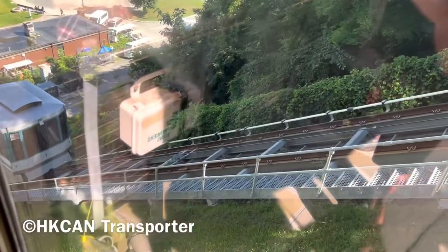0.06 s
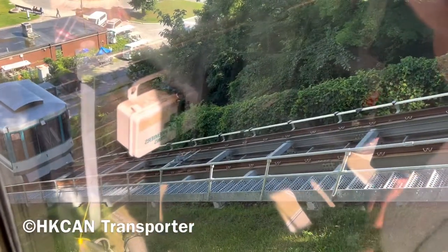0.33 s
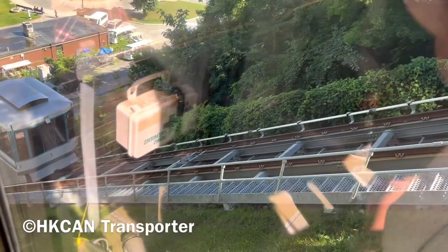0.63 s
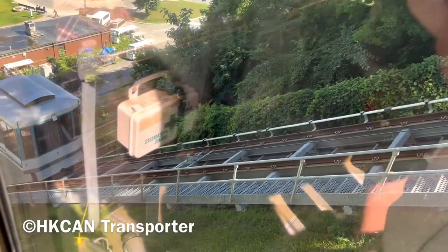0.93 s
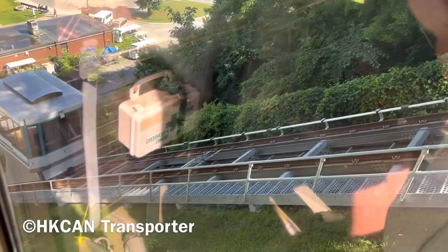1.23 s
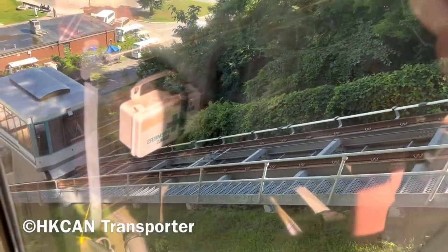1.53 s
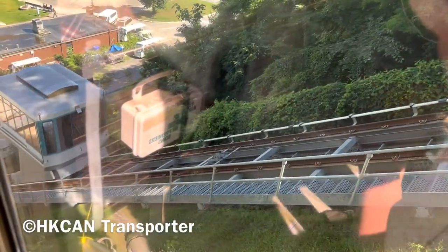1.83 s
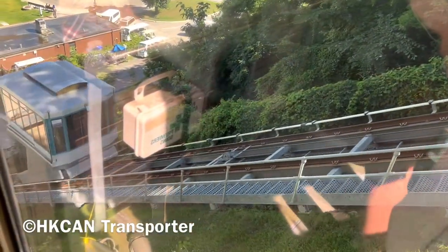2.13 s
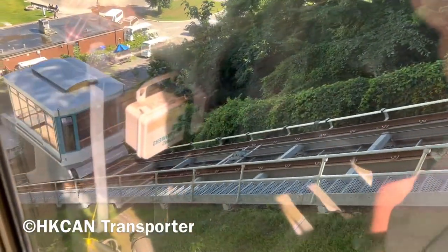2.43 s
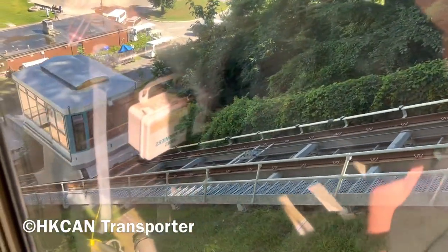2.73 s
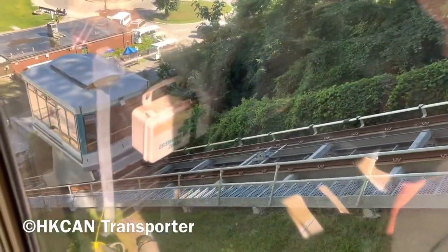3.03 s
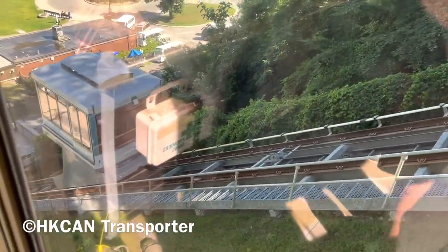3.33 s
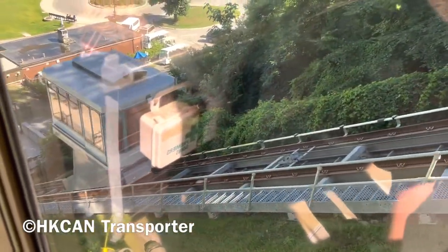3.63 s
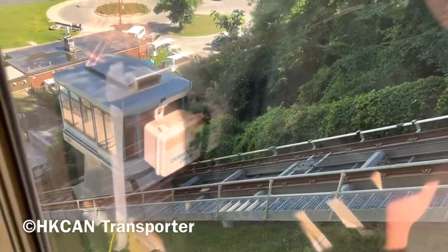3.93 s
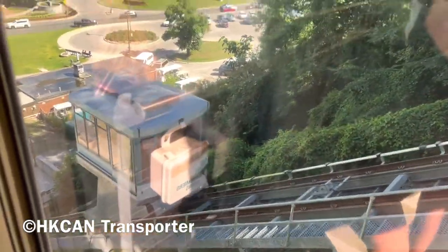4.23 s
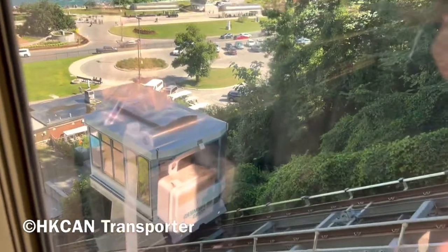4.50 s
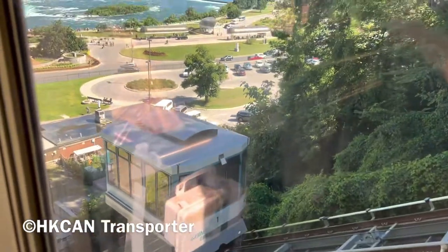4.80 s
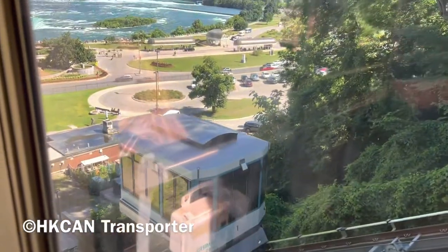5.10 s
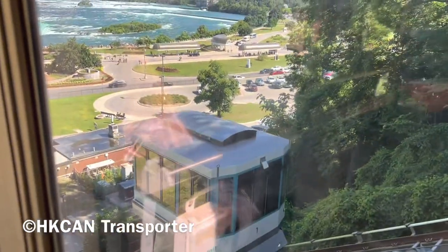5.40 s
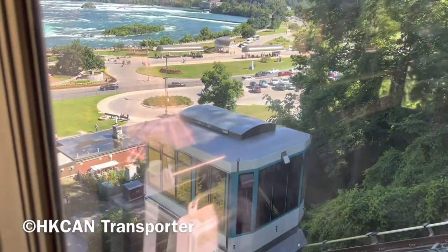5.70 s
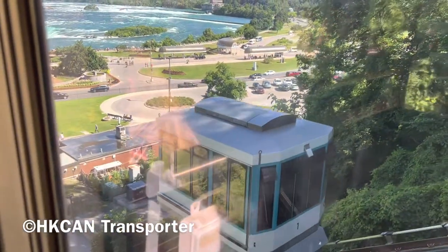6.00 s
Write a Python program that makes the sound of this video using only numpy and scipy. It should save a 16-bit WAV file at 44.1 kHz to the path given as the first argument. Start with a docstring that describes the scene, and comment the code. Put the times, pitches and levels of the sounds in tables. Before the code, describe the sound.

Inside a moving funicular cabin, a steady low hum sits over rumbling wheels and a throbbing floor, with faint rail hiss.

```python
"""A throbbing floor and rumbling wheels, heard on two microphones inside a funicular cabin.
It runs down its track at a steady speed, booming harder on rough stretches; the wheels hiss on the
rails and the cabin rings with them. A machine on board gives a steady 203 Hz hum that seems to waver
as it mingles with nearby rumble, and a thin whine that comes and goes. Two faint, high swishes pass
by, and late in the ride a wheel thumps once."""
import sys
import numpy as np
from scipy import signal
from scipy.fft import rfft, irfft, next_fast_len
from scipy.io import wavfile
from scipy.ndimage import uniform_filter1d, map_coordinates

SR = 44100
rng = np.random.default_rng(int(sys.argv[2]) if len(sys.argv) > 2 else 0)


def transcribe(signal):
    """Save signal, clipped to [-1, 1], as a 16-bit WAV file at the path in sys.argv[1]."""
    frames = np.atleast_2d(signal).T
    limited = np.clip(frames, -1, 1)
    pcm = np.round(limited * 32767).astype(np.int16)
    wavfile.write(sys.argv[1], SR, pcm)


N = 271215
TIME = np.arange(N) / SR
FFT_SIZE = next_fast_len(N + 8192)
BIN_HZ = np.fft.rfftfreq(FFT_SIZE, 1 / SR)

# Balance between the microphones. Each row: frequency in Hz, left minus right in dB.
MIC_BALANCE = [(60, 1.5), (200, -4), (320, -3), (410, -5.5), (480, -6.5), (545, 2.5), (615, -4.5),
               (800, -3.5), (1000, -0.5), (2700, -1), (3600, 0.5), (4300, 2), (5000, 7.5), (6100, 7.5),
               (7200, 3.5), (8500, -1.5)]


def amp(db):
    """Decibels to gain."""
    return 10 ** (np.asarray(db) / 20)


def unit(x):
    """Scale to rms 1."""
    return x / np.sqrt(np.mean(x ** 2) + 1e-20)


def along(points, hz):
    """Read (Hz, value) points on a log frequency axis."""
    freqs, values = np.transpose(points)
    return np.interp(np.log(hz + 1), np.log(freqs + 1), values)


def curve(points):
    """Join (seconds, value) points into one value per sample."""
    return np.interp(TIME, *np.transpose(points))


def bump(peak_s, half_s):
    """A bell-shaped rise to 1 at peak_s and fall back to 0."""
    return np.exp(-.5 * ((TIME - peak_s) / half_s) ** 2)


def wobble(rate):
    """A smooth random curve, rate knots a second."""
    return map_coordinates(rng.standard_normal(int(N * rate / SR) + 4), [TIME * rate])


def placed(balance_db):
    """Gains at the left and right microphone for a level difference."""
    return amp(np.array([[.5], [-.5]]) * balance_db)


def tone(hz, drift):
    """A sine of rms 1 whose phase wanders by about drift radians."""
    return np.sqrt(2) * np.sin(2 * np.pi * (hz * TIME + rng.random()) + drift * wobble(1.926))


def beating(hz, beat_hz, partner_db, swell_s, drift):
    """A wandering sine and a weaker one beat_hz away: they swell together at swell_s and every beat."""
    phase = 2 * np.pi * (hz * TIME + rng.random()) + drift * wobble(1.8)
    partner = amp(partner_db) * np.sin(phase + 2 * np.pi * beat_hz * (TIME - swell_s))
    return np.sqrt(2) * (np.sin(phase) + partner)


def cabin_and_mic_colour(ripple_db):
    """The cabin's resonances and dips, plus a narrow microphone notch near 5.5 kHz, in dB."""
    # Each row: centre in Hz, width in Hz, lift in dB.
    peaks_and_dips = [(190, 8, 5.5), (237, 17, 2.5), (296, 18, 2.5), (425, 25, -6), (478, 24, 5),
                      (511, 14, 5.5), (538, 24, -3.5), (578, 10, 2.5), (610, 22, 5), (651, 14, 4.5),
                      (678, 16, 2.5), (728, 36, 5.5), (800, 24, 2), (952, 15, 6.5), (990, 30, 3),
                      (1083, 17, 6), (1210, 80, 4), (1300, 80, -1.5), (1520, 130, 1.5), (1750, 100, 1.5),
                      (1927, 18, 3), (2005, 36, -2), (2055, 45, 3.5), (2360, 120, 1.5), (3200, 260, 3.5),
                      (4113, 16, 2.5), (5490, 70, -5), (5980, 170, 2.5)]
    lift_db = sum(db / (1 + (2 * (BIN_HZ - hz) / width) ** 2) for hz, width, db in peaks_and_dips)
    knots = rng.standard_normal((2, 4096))  # small cabin modes on two sound paths: a knot every 16 Hz
    ripple = np.array([map_coordinates(path, [BIN_HZ / 16], mode="mirror") for path in knots])
    return lift_db + ripple_db * ripple


def cabin_noise(spectrum, patchy_db, ripple_db):
    """Stereo noise of rms 1 with slow patches, as the microphones pick it up through the cabin."""
    # How alike the microphones sound. Each row: frequency in Hz, likeness from 0 to 1.
    likeness = [(60, .99), (200, .97), (320, .9), (410, .55), (500, .8), (650, .4), (950, .55), (1300, .35),
                (2000, .25), (3000, .1), (6000, .12), (8500, .5), (10000, .95), (11800, .55), (13000, .9)]
    # Phase between them. Each row: frequency in Hz, lead of the left in radians.
    left_lead = [(200, 0), (400, .25), (550, 1), (950, 1.7), (1200, .5), (1500, -2.6), (2500, -.6),
                 (7000, 0), (8500, -1.6), (10000, -3.1), (11500, -4), (12700, -6.3)]
    white = signal.stft(rng.standard_normal((2, N)), nperseg=1024)[2]
    patches = uniform_filter1d(rng.standard_normal(white.shape[1:]), 12, axis=0)
    patches = unit(uniform_filter1d(patches, 10, axis=1))
    noise = signal.istft(white * amp(patchy_db * patches), nperseg=1024)[1][:, :N]
    colour_db = along(spectrum, BIN_HZ) + cabin_and_mic_colour(ripple_db)
    shared, apart = rfft(noise, FFT_SIZE) * amp(colour_db)
    # Long waves reach both microphones alike; shorter ones differ in level and phase.
    spread = np.arccos(np.clip(along(likeness, BIN_HZ), -1, 1)) / 2
    sides = np.array([[1], [-1]])
    mics = np.cos(spread) * shared + sides * np.sin(spread) * apart
    mics *= np.exp(.5j * sides * along(left_lead, BIN_HZ))
    mics *= placed(along(MIC_BALANCE, BIN_HZ))
    return unit(irfft(mics, FFT_SIZE)[:, :N])


def floor_boom(lift_db):
    """Underfoot, the floor booms in its lowest modes and throbs with two close tones that beat."""
    # The shaking floor. Each row: frequency in Hz, relative level in dB.
    spectrum = [(12, -29.5), (25, -22.5), (36, -18.5), (42, -5), (51, 2.5), (64, -5), (80, -10.5),
                (120, -34.5), (400, -93.5)]
    # The throb's stronger tone. Each row: time in seconds, level in dB.
    throb_levels = [(0, -31.5), (.9, -29), (1.7, -34.5), (3.3, -32), (4.05, -28.5), (4.9, -33.5),
                    (6.15, -36.5)]
    shake = cabin_noise(spectrum, patchy_db=2, ripple_db=1)
    running_rms = np.sqrt(np.abs(uniform_filter1d(np.mean(shake ** 2, axis=0), size=SR // 5)) + 1e-9)
    throb = beating(56.34, beat_hz=-5.83, partner_db=-2.5, swell_s=.037, drift=.1)
    return amp(-33.5 + lift_db) * shake / running_rms + amp(curve(throb_levels)) * throb


def wheels(lift_db):
    """Steel wheels on rails, from inside: rumble, shaken panels, rolling hiss and running-gear tones."""
    # The three noises. Each row: frequency in Hz, relative level in dB.
    rumble_spectrum = [(40, -32), (72, 0.5), (86, -7.5), (112, -1), (122, -4.5), (133, 1.5), (155, 3.5),
                       (177, -7), (190, 0), (220, -5), (300, -10.5), (450, -24.5), (1500, -74.5)]
    panel_spectrum = [(100, -21), (250, 1), (380, 3.5), (720, -3), (860, -7), (1300, -22.5), (4000, -64.5)]
    rolling_spectrum = [(300, -21.5), (700, -8), (950, -5), (1320, -7.5), (1650, -6.5), (2700, -14.5),
                        (3300, -19), (4200, -21), (6200, -28.5), (7300, -30.5), (8900, -33.5), (12000, -79)]
    # Their course along the ride. Each row: time in seconds, level in dB.
    panel_levels = [(0, -28), (1.2, -28), (1.5, -29), (3.2, -28), (4.3, -29.5), (5.7, -28.5)]
    rolling_levels = [(0, -35), (1.7, -35), (2.5, -35), (3.3, -34.5), (4.5, -35), (4.8, -34), (5.2, -35),
                      (5.6, -35), (6.15, -34.5)]
    # Tones of the running gear. Each row: multiple of the wheel rate, base level in dB.
    gear_orders = [(6, -35), (7, -42), (9, -38), (12, -49.5)]
    # They swell and sink together. Each row: time in seconds, lift in dB.
    gear_lifts = [(.5, 0.5), (.85, 2), (1.6, -1), (2.6, 0.5), (3.2, -3), (4.5, 0), (6.1, -2.5)]
    wheel_hz = 18.8
    rumble_db = -26.5 + lift_db + .6 * wobble(7)
    rumble = amp(rumble_db) * cabin_noise(rumble_spectrum, patchy_db=1, ripple_db=-.45)
    panels = amp(curve(panel_levels)) * cabin_noise(panel_spectrum, patchy_db=.5, ripple_db=-.5)
    rolling_db = curve(rolling_levels) + .45 * wobble(16)
    rolling = amp(rolling_db) * cabin_noise(rolling_spectrum, patchy_db=1, ripple_db=.8)
    gear = sum(amp(db + curve(gear_lifts) + .69 * wobble(1.6)) * tone(order * wheel_hz, drift=.5)
               for order, db in gear_orders)
    return rumble + panels + rolling + gear


def machine_hum():
    """A machine's steady 203 Hz hum, which seems to waver as it mingles with nearby rumble."""
    # The harmonics. Each row: multiple of the pitch, relative level in dB, left minus right in dB.
    harmonics = [(1, -.4, -1.3), (2, -21.5, -6), (3, -31, 5.5)]
    # A level curve stands for that mingling. Each row: time in seconds, apparent level in dB.
    apparent_levels = [(0.0, -14), (0.03, -20), (0.19, -17), (0.26, -27), (0.34, -17.5), (0.53, -21),
                       (0.56, -17.5), (0.65, -21), (0.68, -24.5), (0.72, -20), (1.04, -18.5), (1.13, -24.5),
                       (1.18, -16.5), (1.3, -21), (1.37, -17), (1.49, -25.5), (1.56, -18), (1.63, -21),
                       (2.09, -19.5), (2.12, -24), (2.16, -18.5), (2.3, -21), (2.35, -16), (2.43, -18.5),
                       (2.5, -28.5), (2.53, -20.5), (2.79, -18), (2.89, -23.5), (2.94, -21.5),
                       (3.19, -18.5), (3.22, -21), (3.27, -17.5), (3.32, -28), (3.36, -18.5), (3.63, -18.5),
                       (3.68, -20), (3.73, -19.5), (3.92, -22), (3.99, -17.5), (4.16, -21), (4.2, -16),
                       (4.25, -20), (4.38, -17), (4.64, -21), (4.66, -21.5), (4.71, -17), (4.92, -22.5),
                       (5.17, -19), (5.26, -22.5), (5.34, -19), (5.45, -23.5), (5.53, -19), (5.57, -27),
                       (5.6, -14.5), (5.64, -21.5), (5.67, -18), (6.01, -20), (6.05, -21.5), (6.12, -17),
                       (6.15, -17)]
    pitch_hz, mingling_db = 203.1, .35
    hum = 0
    for order, db, side_db in harmonics:
        partial = beating(order * pitch_hz, beat_hz=5.03, partner_db=-25, swell_s=.2, drift=.096 * order)
        hum += amp(db) * placed(side_db) * partial
    return amp(curve(apparent_levels) + mingling_db * wobble(10)) * hum


def machine_whine():
    """The machine's thin, fluttering whine, centred between the microphones."""
    # It comes and goes. Each row: time in seconds, level in dB.
    levels = [(0, -49), (.85, -48), (1.45, -55), (2.25, -49.5), (2.65, -50), (3.25, -44), (4.1, -57),
              (4.4, -47), (4.7, -55), (5.5, -47), (6.15, -55)]
    flutter_db = 2.5 * wobble(14)
    return amp(curve(levels) + flutter_db) * tone(1161.5, drift=1)


def air_hiss():
    """A faint, steady hiss of air in the background."""
    # Each row: frequency in Hz, relative level in dB.
    spectrum = [(3000, -20), (7000, -2), (9000, 3), (11500, 5), (13200, 2), (15200, -6)]
    return amp(-61.8) * cabin_noise(spectrum, patchy_db=.4, ripple_db=.5)


def rough_track():
    """Lifts in dB of the boom and the rumble as the cabin crosses rough stretches."""
    # Each row: middle in seconds, boom lift in dB, rumble lift in dB, half length in seconds.
    stretches = [(0.652, 2.5, -1, 0.39), (1.124, -1.5, 2.5, .05), (3.22, 9, 1, 0.2), (3.348, 3.5, 0, 0.024),
                 (4.85, 3, 2, .08), (5.265, 4.5, -1, 0.076)]
    return sum(np.outer([boom_db, rumble_db], bump(middle_s, half_s))
               for middle_s, boom_db, rumble_db, half_s in stretches)


def cabin_rings():
    """Now and then one of the cabin's resonances swells briefly out of the drone."""
    # Each row: peak time in seconds, pitch in Hz, level in dB, half length in seconds.
    rings = [(.5, 511, -36, .05), (.71, 608, -34.5, .03), (1.005, 608, -34, .03), (2.42, 480, -36, .03),
             (2.75, 479, -41.5, .22), (2.78, 404, -37.5, .035), (3.63, 402, -35, .025),
             (3.69, 495, -32, .032), (5.055, 612, -29.5, .018), (5.25, 480, -36, .04),
             (5.555, 484, -32, .028), (5.72, 410, -33.5, .045)]
    return sum(amp(db) * bump(peak_s, half_s) * tone(hz, drift=.17) * placed(along(MIC_BALANCE, hz))
               for peak_s, hz, db, half_s in rings)


def swishes():
    """Two soft, very high swishes of noise, one just after the other."""
    # Each row: peak time in seconds, level in dB, half length in seconds.
    passes = [(1.822, -56.7, 0.031), (1.938, -58, 0.024)]
    # Each row: frequency in Hz, relative level in dB.
    spectrum = [(3000, -60), (9000, -18), (11200, 4), (13800, 2), (15500, -13)]
    swell = sum(amp(db) * bump(peak_s, half_s) for peak_s, db, half_s in passes)
    return swell * cabin_noise(spectrum, patchy_db=3.5, ripple_db=1)


def wheel_thump():
    """A wheel drops over an uneven spot: the floor's low modes rise softly and die away."""
    # Each row: frequency in Hz, level in dB before the rise and decay.
    floor_modes = [(72, -18.5), (93, -19.5), (116, -21.5)]
    start_s, rise_s, t60_s = 4.755, .025, .28
    age = np.maximum(TIME - start_s, 0)
    envelope = amp(-60 * age / t60_s) * (1 - np.exp(-age / rise_s))
    return envelope * sum(amp(db) * tone(hz, drift=.32) for hz, db in floor_modes)


def scene():
    """Everything that reaches the two microphones in the cabin."""
    boom_lift_db, rumble_lift_db = rough_track()
    ride = floor_boom(boom_lift_db) + wheels(rumble_lift_db) + wheel_thump() + cabin_rings()
    return ride + machine_hum() + machine_whine() + swishes() + air_hiss()


def record(dry):
    """The sound eases in and out within milliseconds, and nothing above the band limit is kept."""
    fade_s, top_hz = .004, 15500
    fade = np.clip(np.minimum(TIME, TIME[::-1]) / fade_s, 0, 1)
    return irfft(rfft(dry * fade, FFT_SIZE) * (BIN_HZ < top_hz), FFT_SIZE)[:, :N]


dry = scene()
out = record(dry)
transcribe(out)
```